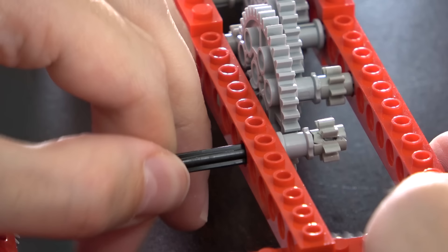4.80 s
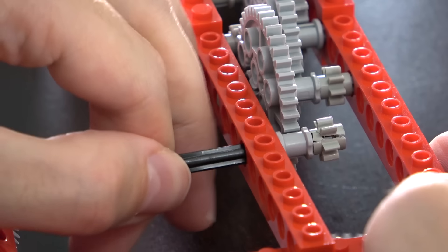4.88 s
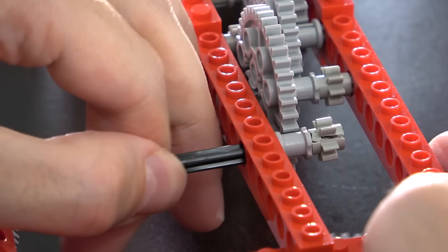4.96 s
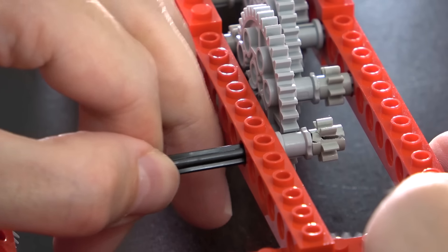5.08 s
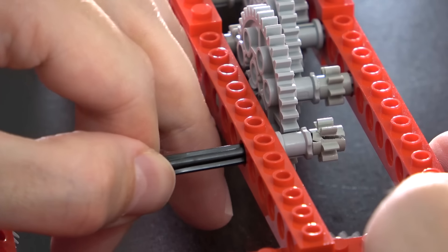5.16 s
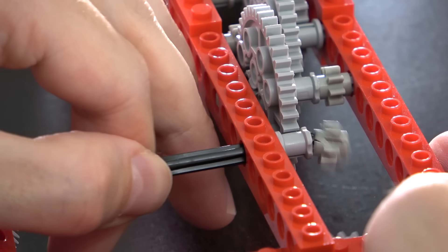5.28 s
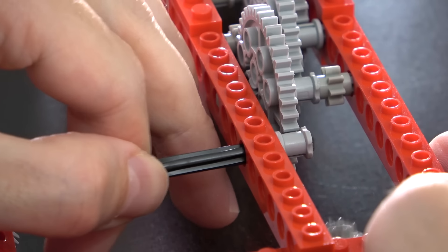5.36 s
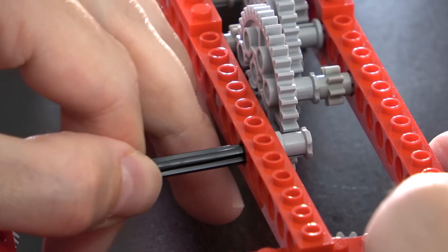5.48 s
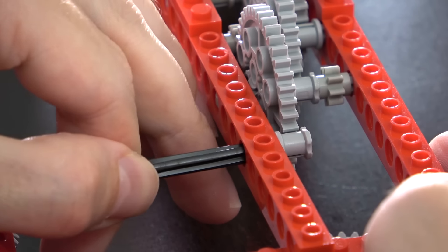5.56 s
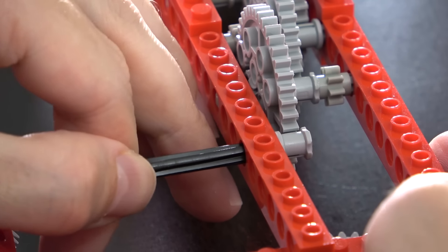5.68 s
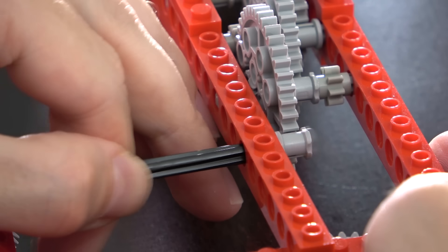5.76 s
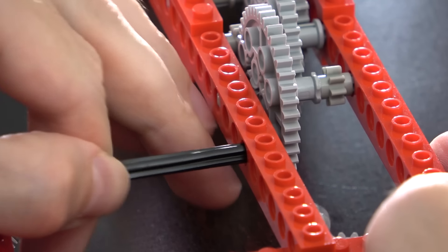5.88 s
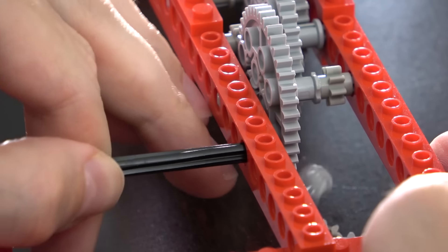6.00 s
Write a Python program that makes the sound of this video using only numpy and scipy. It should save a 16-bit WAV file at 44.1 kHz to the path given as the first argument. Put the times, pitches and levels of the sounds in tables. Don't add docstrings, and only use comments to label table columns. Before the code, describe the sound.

A small motor rattles through plastic gears over fan hum and stops, then a quiet room with a sharp snap, knocks and small parts bouncing.

```python
import sys
import numpy as np
from scipy import signal
from scipy.fft import rfft, irfft, next_fast_len
from scipy.io import wavfile
from scipy.ndimage import map_coordinates

SR = 44100
rng = np.random.default_rng(int(sys.argv[2]) if len(sys.argv) > 2 else 0)


def natural_amplitude(level_db):
    exponent = np.asarray(level_db, float) / 20
    return 10 ** exponent


def wav_out(sig):
    wavfile.write(sys.argv[1], SR, np.round(np.clip(np.atleast_2d(sig).T, -1, 1) * 32767).astype(np.int16))


N = 265967
TIME = np.arange(N) / SR


def unit(x):
    return x / np.sqrt(np.mean(x ** 2) + 1e-20)


def noise():
    return rng.standard_normal(N)


def along(points, hz):
    f, v = np.transpose(points)
    return np.interp(np.log(hz + 1), np.log(f + 1), v)


def wobble(rate):
    return map_coordinates(rng.standard_normal(int(N * rate / SR) + 4), [TIME * rate])


def spell(start, end, edge):
    return np.clip(np.minimum(TIME - start, end - TIME) / edge + 0.5, 0, 1)


def after(s):
    return np.clip(TIME - s, 0, None)


def filtered(x, response):
    m = next_fast_len(N + SR // 2)
    gain = response(np.fft.rfftfreq(m, 1 / SR))
    gain = unit(np.abs(gain)) * np.exp(1j * np.angle(gain))
    return irfft(rfft(x, m) * gain, m)[..., :N]


def prompt(gain):
    cepstrum = irfft(np.log(np.abs(gain) + 1e-6))
    cepstrum[1:len(gain) - 1] *= 2
    cepstrum[len(gain):] = 0
    return np.exp(rfft(cepstrum))


def colour(points):
    return lambda f: prompt(natural_amplitude(along(points, f)))


def modes(table):
    def response(f):
        total = 0
        for k, (hz, width, db) in enumerate(table):
            total = total + (-1) ** k * natural_amplitude(db) * 1j * f * width / (hz * hz - f * f + 1j * f * width)
        return total
    return response


def steep(table):
    return lambda f: prompt(modes([(hz, width, db / 2) for hz, width, db in table])(f) ** 2)


def blurred(table, times):
    def response(f):
        power = sum(np.abs(steep([(hz, width * times, db)])(f)) ** 2 for hz, width, db in table)
        return prompt(np.sqrt(power))
    return response


def grit(spread_db):
    return unit(noise() * natural_amplitude(spread_db * wobble(2500)))


def contacts(times, levels_db, t60s):
    force = np.zeros((2, N + SR))
    t = np.arange(SR // 20) / SR
    for s, db, t60 in zip(times, levels_db, np.broadcast_to(t60s, len(times))):
        jolt = rng.standard_normal(len(t)) * natural_amplitude(3.5 * rng.standard_normal(len(t)))
        burst = natural_amplitude(db - 60 * t / t60) * (1 - np.exp(-t / 0.00056)) * jolt
        start = round(s * SR)
        force[0, start:start + len(t)] += burst
        force[1, start] += np.linalg.norm(burst)
    return force[:, :N]


# frequency in Hz, level in dB per Hz.
ROOM_TONE = [(15, -17.5), (25, -5), (61, -8.5), (161, -18), (179, -19.5), (284, -22.5), (316, -25.5),
             (449, -26), (587, -29), (834, -29), (905, -32), (3780, -44.5), (15800, -52)]
# frequency in Hz, likeness from 0 to 1.
LIKENESS = [(60, 0.71), (240, 0.92), (950, 0.34), (3770, 0.66), (15000, 0.72)]


def room_tone():
    def mid_and_side(hz):
        turn = np.arccos(np.clip(along(LIKENESS, hz), -1, 1)) / 2
        return natural_amplitude(along(ROOM_TONE, hz)) * [np.cos(turn), np.sin(turn)]
    mid, side = filtered(rng.standard_normal((2, N)), mid_and_side)
    return natural_amplitude(-55.5) * unit(np.array([mid + side, mid - side]))


# frequency in Hz, level in dB per Hz.
FAN_AIR = [(15, -54), (25, -16.5), (82, -3.5), (150, -7), (330, -6), (650, -6), (900, -10), (1280, -2.5),
           (1500, -22.5), (2500, -23), (4900, -28.5), (5900, -21.5), (9000, -23.5), (15800, -31.5)]
# frequency in Hz, level in dB.
FAN_DUCT = [(850, -24), (940, -22), (1010, 4), (1100, -7), (1270, 3), (1400, -1), (1460, -23)]


def fan():
    duct = unit(filtered(noise(), colour([(800, -120)] + FAN_DUCT + [(1550, -120)])))
    air = unit(filtered(noise(), colour(FAN_AIR)))
    duct_db = -3.5 - 6 * spell(-1, 2.07, 0.04)
    level_db = -47 - 4 * spell(0.38, 1.34, 0.42)
    return natural_amplitude(level_db) * (natural_amplitude(duct_db) * duct + natural_amplitude(-2.0) * air)


# start in seconds, peak in dB, pitch in Hz, t60 in seconds.
DESK_THUMPS = [
    (1.933, -33.5, 107, 0.081),
    (3.22, -42, 61.6, .4),
    (4.027, -33, 151, 0.04),
    (4.111, -42, 149, 0.083),
    (4.306, -38.5, 152, 0.066),
    (5.889, -44, 102, 0.12),
]
# start in seconds, level in dB.
DRAWER_NUDGES = [
    (4.7, -49),
    (5.03, -64),
    (5.29, -63),
    (5.47, -51.5),
]


def desk():
    t60, rise = 0.9, 0.015
    sound = 0
    for s, db, hz, thump_t60 in DESK_THUMPS:
        since = after(s)
        swell = natural_amplitude(db - 60 * since / thump_t60) * (1 - np.exp(-since / 0.0039))
        sound = sound + swell * np.sin(2 * np.pi * hz * since)
    note = unit(filtered(noise(), steep([(333, 40, -3), (588.5, 45, 0)])))
    nudged = sum(natural_amplitude(db - 60 * after(s) / t60) * (1 - np.exp(-after(s) / rise)) for s, db in DRAWER_NUDGES)
    return sound + nudged * note


# frequency in Hz, width in Hz, level in dB.
FRAME_MODES = [(293, 13, -9), (330, 4.7, -5), (426, 50, -11), (588, 26, -3), (767, 49, -1), (978, 68, -2),
               (1104, 43, -0.5), (1283, 73, -6), (1415, 240, -9), (1507, 72, -2), (1756, 44, 0.5),
               (1934, 65, -4.5), (2282, 320, -19.5), (2780, 160, -17)]
# frequency in Hz, level in dB.
FRAME_BULK = [(200, -26.5), (500, -21), (1500, -17), (2050, -11.5), (2400, -16.5), (3000, -26), (5700, -35),
              (9000, -48)]


def beams(f):
    main = np.abs(modes(FRAME_MODES)(f) / (1 + 1j * f / 4500) ** 2)
    return prompt(np.hypot(main, natural_amplitude(along(FRAME_BULK, f) - 4.5)))


# start in seconds, high ring in dB, low ring in dB over the high,
# frame in dB over the high.
GEAR_BOUNCES = [(5.2007, -62, 10, -3), (5.46, -25, -4, -7), (5.4738, -48.5, 0, 10),
                (5.4935, -35.5, -3.5, -5.5), (5.5434, -37, -4, -30), (5.5677, -52, -11, -22),
                (5.5847, -64, 9, 1), (5.6133, -72, 2, -3), (5.9631, -29, -28, -36),
                (5.9668, -21.5, -28, -22), (6.0106, -34, -16, -8)]
# start in seconds, high ring in dB, low ring in dB over the high,
# frame in dB over the high.
BUSH_BOUNCES = [(5.6447, -60.5, 1.5, -3), (5.6674, -64.5, -8.5, -23), (5.675, -58, -9, -14),
                (5.8815, -50, 2, -5), (5.8845, -38.5, 7, 1), (5.8913, -39, 4, -20), (5.901, -48, -15, -13),
                (5.9179, -42.5, 7.5, -14), (5.9705, -43.5, -16, 6), (5.9783, -51.5, -14, -2),
                (5.9932, -54, -9, 7), (6.007, -52, -4, -12)]
# frequency in Hz, width in Hz, level in dB.
PART_HIGH = [(7700, 950, -0.5), (8900, 590, 11.5), (9900, 1100, 2), (11270, 640, 11), (13600, 2460, -4)]
# frequency in Hz, width in Hz, level in dB.
PART_MID = [(4660, 910, -1.5), (5650, 450, 9), (6750, 1700, -6.5)]
# frequency in Hz, width in Hz, level in dB.
GEAR_LOW = [(2830, 570, -15), (3930, 390, 3)]
# frequency in Hz, width in Hz, level in dB.
BUSH_LOW = [(2250, 530, -8), (3100, 670, 9.5), (3990, 810, -2.5)]


def loose_parts():
    sound = 0
    for bounces, low, mid_db in [(GEAR_BOUNCES, GEAR_LOW, -10.5), (BUSH_BOUNCES, BUSH_LOW, 5.5)]:
        s, db, low_db, frame_db = np.transpose(bounces)
        for over_db, body, t60 in [(0, PART_HIGH, 0.007), (low_db, low, 0.008), (mid_db, PART_MID, 0.007)]:
            burst, click = contacts(s, db + over_db + 0.1, t60)
            ring = filtered(burst, steep(body))
            sound = sound + np.array([ring, natural_amplitude(-5.0) * filtered(click, blurred(body, 2.9))])
        sound = sound + filtered(contacts(s + 0.00287, db + frame_db - 5.0, 0.04), beams)
        tap = filtered(contacts(s, db - 17, 0.0045), colour(SNAP_TONE))
        sound = sound + natural_amplitude([[0], [-6]]) * tap
    return sound


# start in seconds, crack in dB, frame in dB over the crack, tick in dB over # the
KNOCKS = [(2.8106, -49, -1, -15), (3.9519, -36, -12, -19), (3.9621, -29, -3.5, -21),
          (3.9697, -28, -7.5, -16), (4.004, -36, -5, -18), (4.0289, -24, 12.5, -9), (4.0533, -41, 5, -16),
          (4.0696, -39, 10, -13), (4.111, -26.5, 11.5, -11.5), (4.1314, -41, 7, -21),
          (4.1468, -40, 18, -11), (4.1964, -41, 15.5, -10), (4.2262, -30.5, 4.5, -11.5),
          (4.298, -36.5, 13.5, -13), (4.4529, -22.5, -2, -10.5), (4.4643, -21, -7, -25),
          (4.5835, -38, -6, -19), (4.6303, -39, 12.5, -16), (4.8108, -33.5, -10, -23),
          (5.178, -45, -10, -12), (5.397, -50, -14, -23.5)]
# start in seconds, crack in dB, frame in dB
# over the crack, lag of the second edge in seconds.
ROCKS = [
    (4.1725, -32, 10.5, .006),
    (4.3039, -19.5, 5, .0066),
    (4.4051, -19, 2.5, .006),
    (4.516, -28, 2.5, .0063),
    (4.568, -31, 2.5, .0044),
    (4.6018, -32, 3, .0085),
]
# frequency in Hz, level in dB per Hz.
CRACK_TONE = [(900, -31.5), (2000, -1.5), (2800, 1), (3400, -4.5), (4900, -5.5), (6000, -10.5), (7200, -23),
              (16000, -58.5)]
# frequency in Hz, level in dB per Hz.
TICK_TONE = [(4000, -20), (7000, -2), (9500, 3.5), (12000, 3), (14000, -19), (16000, -17)]


def dragging():
    start, end = 4.383, 4.62
    growth_db = 36 * (after(start) - after(end))
    level_db = -34 + growth_db - 244 * after(end)
    crackle = unit(filtered(grit(4) * natural_amplitude(3 * wobble(120)), colour(CRACK_TONE)))
    scrape = unit(filtered(grit(4.5), beams)) + natural_amplitude(-13) * crackle
    return spell(start, end + 0.2, 0.026) * natural_amplitude(level_db - 13.5) * scrape * natural_amplitude([[0.5], [-3]])


def frame():
    touches = list(KNOCKS)
    for s, db, frame_db, lag in ROCKS:
        touches.append((s, db, frame_db, -14))
        touches.append((s + lag, db - 4.5, frame_db + 0.5, -14 - 12))
    s, db, frame_db, tick_db = np.transpose(touches)
    t60 = 0.027
    crack = filtered(contacts(s, db - 9.5, t60 * 0.99), colour(CRACK_TONE)) * natural_amplitude([[1.5], [-3]])
    tick = filtered(contacts(s, db + tick_db + 2.5, t60 * 0.31), colour(TICK_TONE)) * natural_amplitude([[0], [-7]])
    burst, click = contacts(s, db + frame_db + 0.3, t60 * 1.196)
    ring = filtered(np.array([0.61 * burst + 0.25 * click, click]), beams)
    return crack + tick + ring + dragging()


# start in seconds, peak in dB, t60 in seconds.
SNAP_BURSTS = [
    (3.1763, -3.5, 0.024),
    (3.179, -8.5, 0.0078),
    (3.184, -22.5, 0.013),
]
# frequency in Hz, level in dB per Hz.
SNAP_TONE = [(60, -51), (180, -31.5), (600, -6.5), (1400, -6.5), (3000, -2), (4700, 0), (6200, -9.5),
             (10500, 1), (13500, -7.5), (16000, -17)]
# frequency in Hz, level in dB per Hz.
SNAP_ROOM = [(60, -41), (230, -2), (600, -3), (1050, -1), (2000, -2), (4700, -6), (10500, -7.5),
             (16000, -15)]
# frequency in Hz, width in Hz, level in dB.
SHUDDER_MODES = [(775, 30, -1), (1048, 36, 0)]


def snap():
    burst, click = contacts(*np.transpose(SNAP_BURSTS))
    shudder = spell(3.245, 3.335, 0.03) * natural_amplitude(-42.5) * unit(filtered(grit(2.6), steep(SHUDDER_MODES)))
    return filtered(burst, colour(SNAP_TONE)) + shudder, filtered(click, colour(SNAP_ROOM)) + 0.48 * shudder


def shaft_angle():
    return 2 * np.pi * np.cumsum(140.7 - 0.9 * TIME) / SR


# start in seconds, end in seconds, shaft hum in dB,
# first plate mode in dB, second plate mode in dB.
PRESSES = [
    (-.1, 0.494, -56, -56.5, -56.5),
    (0.634, .87, -66, -59, -58.5),
    (0.967, 1.24, -60, -77, -64),
    (1.255, 1.42, -53, -72, -49.5),
    (1.457, 1.71, -53, -56, -48),
    (1.727, 2.034, -55.5, -61.5, -56),
]
# frequency in Hz, width in Hz, level in dB.
PLATE_MODES = [(243.5, 11, 0), (341.7, 16, -1)]


def pressed_plate():
    shaft, *plate = natural_amplitude(-75) + sum(spell(a, b, 0.05) * natural_amplitude(dbs)[:, None] for a, b, *dbs in PRESSES)
    sound = shaft * natural_amplitude(2.5 * wobble(8.7)) * np.sin(shaft_angle() + 1.1 * wobble(14))
    for gain, (hz, width, db) in zip(plate, PLATE_MODES):
        tone = np.sin(2 * np.pi * hz * TIME + 0.8 * wobble(width))
        sound = sound + gain * natural_amplitude(db + 0.5 + 2.6 * wobble(14)) * tone
    return (TIME < PRESSES[-1][1] + 0.05) * sound


def bearing_squeak():
    start, end = 1.8, 1.91
    slowing = after(start)
    level_db = -38 - 1.5 - 65 * slowing + 1.5 * wobble(50)
    phase = 2 * np.pi * np.cumsum(682 - 650 * slowing) / SR
    return spell(start, end, 0.025) * natural_amplitude(level_db) * np.sin(phase)


# frequency in Hz, width in Hz, level in dB.
TEETH_MODES = [(2946, 590, -8), (3550, 440, -10), (4540, 960, -8), (6030, 640, -3.5), (6790, 830, -1),
               (8560, 1500, -6.5), (10640, 1680, -3.5), (12640, 2900, -4.5), (14100, 3300, -7.5)]
# frequency in Hz, width in Hz, level in dB.
HOUSING_MODES = [(437, 96, -9.5), (577, 21, -3.5), (655, 56, -5.5), (841, 24, -1.5), (973, 49, -5),
                 (1108, 48, -2), (1246, 86, -3.5), (1663, 168, -7), (1859, 10.8, 1), (2070, 180, -8.5),
                 (2442, 39, -1.5)]
# frequency in Hz, width in Hz, level in dB.
JOLT_MODES = [(1077, 220, -6.5), (1700, 438, 1), (2180, 435, 7.5), (2470, 635, 2.5)]
# frequency in Hz, width in Hz, level in dB over the rattle.
AXLE_RINGS = [(1146.5, 39, -18), (1726, 28, -24), (2383, 190, -22), (3080, 33, -24), (3600, 260, -17),
              (4296, 240, -16)]
# start in seconds, peak in dB, t60 in seconds.
LAST_TEETH = [
    (1.929, -12.5, 0.0082),
    (2.066, -45.5, .004),
]
# frequency in Hz, width in Hz, level in dB.
LATCH_MODES = [(1400, 300, -4), (3700, 270, 11.5), (6100, 500, 5), (7000, 500, 3), (8300, 800, 1),
               (12000, 3000, -19)]


def motor():
    power_off, locked = 1.74, 1.95
    dying_db = -29 * after(power_off) - 88 * after(locked)
    housing_db = -6 - (1 - 0.6) * dying_db
    turn = 2 * np.pi * 5.79 * (TIME - 0.025)
    spin = shaft_angle()
    tight = np.exp(5 * (np.cos(turn) - 1)) * (TIME < 1.85)
    fast = np.cos(5 * turn + 0.67)
    swell_db = 1.4 * fast + 0.26 * np.cos(3 * turn + 0.54) + 0.59 * np.cos(spin)
    teeth = grit(1.4) * natural_amplitude(swell_db + 1.02 * wobble(40.2))
    force = grit(3.1) * natural_amplitude(0.68 * fast + 2.3 * tight + 0.69 * np.cos(spin) + 0.12 * wobble(30))

    def housing_response(f):
        return modes(HOUSING_MODES)(f) * (1j * f / (380 + 1j * f)) ** 2
    train = unit(filtered(teeth, modes(TEETH_MODES)))
    train = train + natural_amplitude(housing_db - 2.5) * unit(filtered(force, housing_response))
    train = train + natural_amplitude(-18) * unit(filtered(tight * grit(4.2), steep(JOLT_MODES)))
    for hz, width, db in AXLE_RINGS:
        train = train + natural_amplitude(db + 3.5 * wobble(45)) * unit(filtered(force, steep([(hz, width, 0)])))
    last = filtered(contacts(*np.transpose(LAST_TEETH)).sum(axis=0) * 0.65, steep(LATCH_MODES))
    fade = np.clip((2.12 - TIME) / 0.033, 0, 1)
    return fade * natural_amplitude(-29.5 + dying_db) * train + last


# frequency in Hz, t60 in seconds.
WALLS = [(150, .6), (1000, .62), (3000, .54), (6000, .46), (9000, .4), (12000, .32), (15500, .2)]


def room(direct, spread, wet_db, wide_db, pan_db):
    hz, t, z = signal.stft(rng.standard_normal((2, SR)), SR, nperseg=256)
    decay = natural_amplitude(-60 * t / along(WALLS, hz)[:, None])
    mid, side = signal.istft(z * decay, SR, nperseg=256)[1]
    side = natural_amplitude(wide_db) * side
    tail = np.array([mid + side, mid - side]) / np.linalg.norm(mid)
    wet = signal.fftconvolve(np.pad(spread, (120, 0))[None], tail, axes=1)[:, :N]
    edges = rng.standard_normal(SR // 50) * natural_amplitude(-60 * TIME[:SR // 50] / 0.008)
    scatter = signal.fftconvolve(direct, edges / np.linalg.norm(edges))[:N]
    near = filtered(scatter, lambda f: (1j * f / (9000 + 1j * f)) ** 2)
    both = direct + natural_amplitude(wide_db - 5.5) * near * [[1], [-1]] + natural_amplitude(wet_db) * wet
    return both * natural_amplitude([[pan_db / 2], [-pan_db / 2]])


TAIL_CHANGES = [
    4.16,
    4.29,
    4.39,
    4.55,
]


def scene():
    drive = motor()
    running = room(drive, drive, wet_db=-8, wide_db=-120, pan_db=-2.0)[0]
    running = running + pressed_plate() + bearing_squeak() + fan()
    handled = frame()
    place = np.searchsorted(TAIL_CHANGES, TIME)
    handling = room_tone()
    for k in range(len(TAIL_CHANGES) + 1):
        handling = handling + room(*(handled * (place == k)), wet_db=-8.5, wide_db=-11, pan_db=1.1)
    handling = handling + room(*snap(), wet_db=-10, wide_db=-11.0, pan_db=0.1)
    handling = handling + room(*loose_parts(), wet_db=-6.0, wide_db=-11.5, pan_db=0.9)
    return np.where(TIME < 2.643, running, handling) + desk()


# frequency in Hz, level in dB.
BAND_LIMIT = [(100, 0), (15750, 0), (16000, -25), (16800, -70), (22050, -90)]


def roll_off(x):
    return signal.sosfilt(signal.butter(12, 16780, fs=SR, output="sos"), x)


def record(dry):
    held = dry / (1 + np.abs(dry / 0.7) ** 4) ** 0.25
    return roll_off(filtered(held, colour(BAND_LIMIT)))


dry = scene()
out = record(dry)
wav_out(out)
```